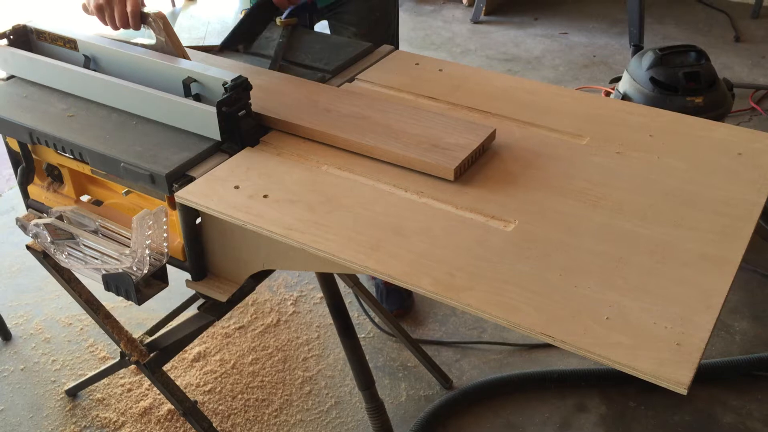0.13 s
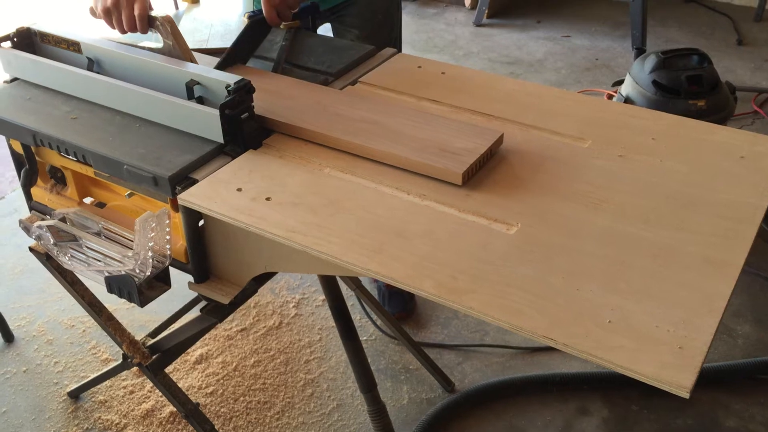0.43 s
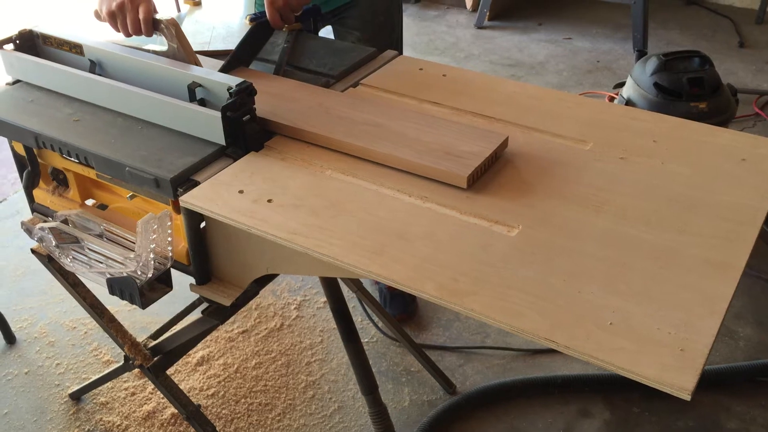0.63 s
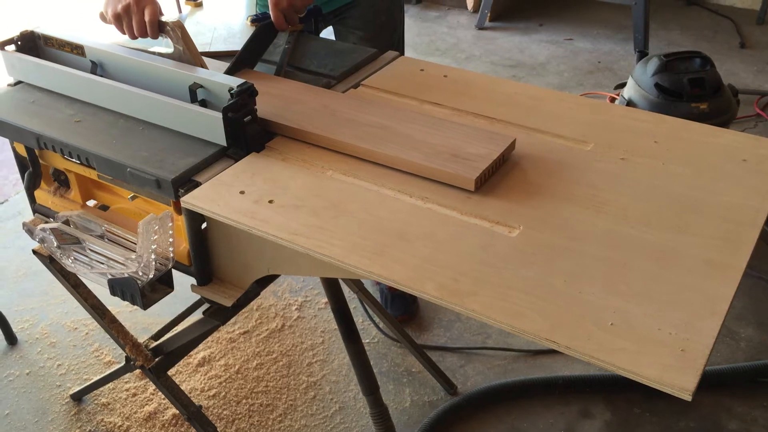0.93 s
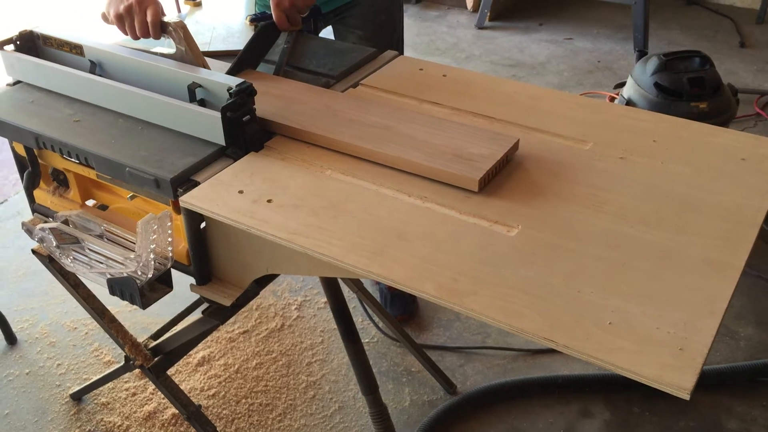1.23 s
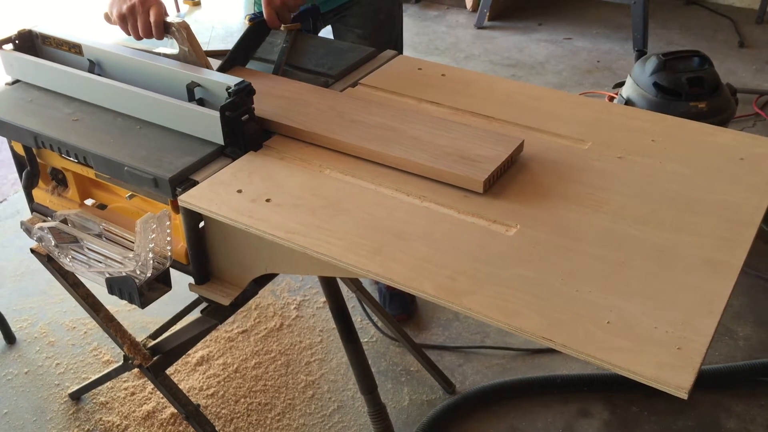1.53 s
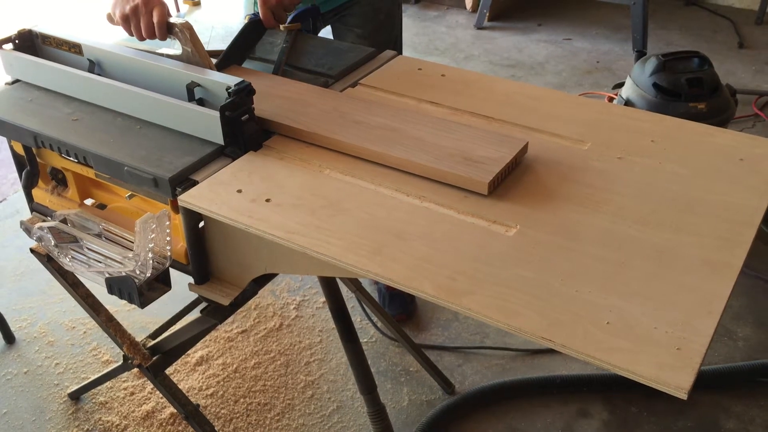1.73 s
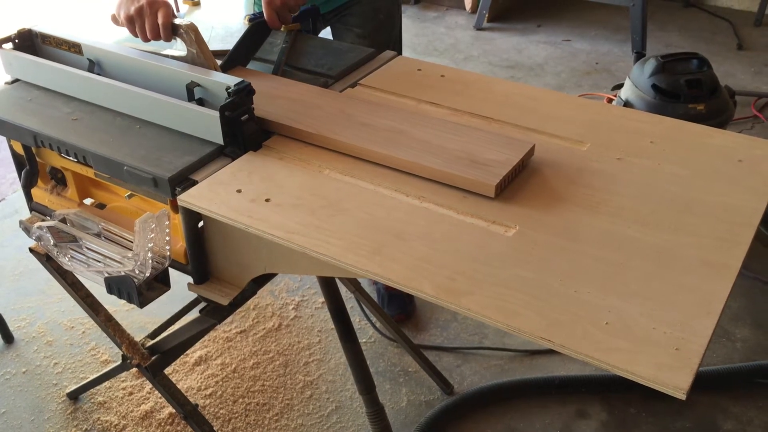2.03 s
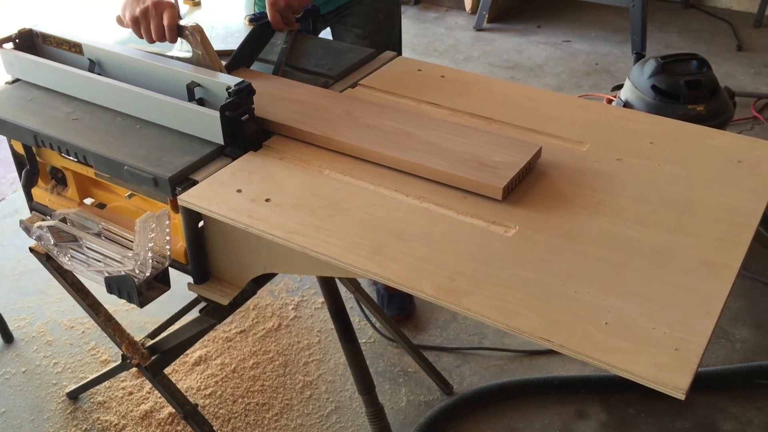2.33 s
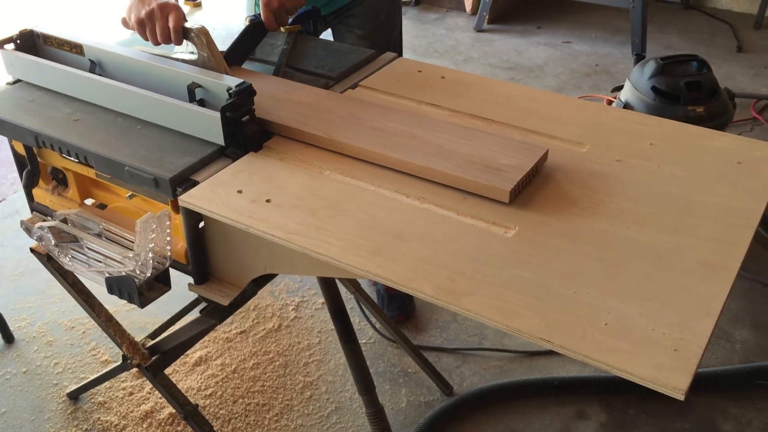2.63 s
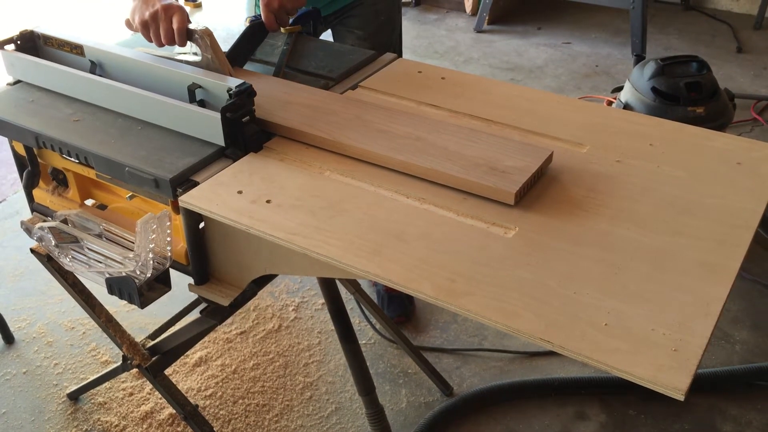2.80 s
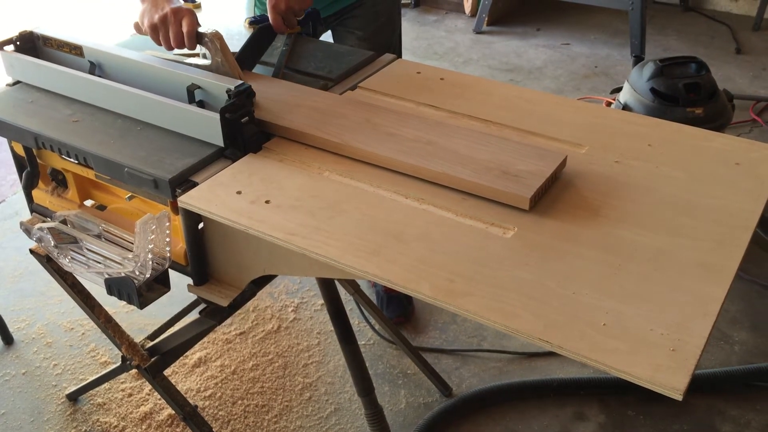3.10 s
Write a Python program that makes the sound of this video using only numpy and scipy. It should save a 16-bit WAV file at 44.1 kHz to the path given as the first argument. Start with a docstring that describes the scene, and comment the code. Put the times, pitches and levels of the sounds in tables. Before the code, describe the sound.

A table saw at full speed cuts in abruptly at about 0.08 seconds after silence. Its rough geared whine climbs slightly in pitch until 1.4, sags a little until about 2.5, then rises again from 3.0 to the end at 3.25, with a brief stronger whine near 3.05. A dense, steady cutting and air roar, boomy in the workshop, fills everything; a shop vacuum hums faintly behind. Mono, no wind-down.

```python
"""In a workshop, a portable table saw rips a board, heard in mono after a brief silence.
A geared brush motor whines as sines on multiples of its shaft speed, which follows a drawn curve.
The slower blade adds side tones and a tooth tone; air, chips and cutting roar underneath as shaped noise
that booms in the stand and room. A shop vacuum hums behind in drifting, wavering tones."""
import sys
import numpy as np
from scipy import signal
from scipy.fft import rfft, irfft, next_fast_len
from scipy.io import wavfile
from scipy.ndimage import uniform_filter1d

SR = 44100
rng = np.random.default_rng(int(sys.argv[2]) if len(sys.argv) > 2 else 0)


def unload_wav(signal):
    """Save mono or channel-first audio to the path in sys.argv[1] as 16-bit WAV at rate SR, clipped to [-1, 1]."""
    wavfile.write(
        sys.argv[1],
        SR,
        np.round(np.clip(np.atleast_2d(signal).T, -1, 1) * 32767).astype(np.int16),
    )


N = 143766  # samples

PINION, WHEEL, BLADE_TEETH = 6, 36, 24  # tooth counts of the reduction gear and the blade
RATTLE = 9 / 11  # rattle turns per shaft turn, perhaps a bearing
WAVER_DB, WAVER_HZ = 5, 4.03  # slow coming and going of the weak tones
FLUTTER_DB, FLUTTER_HZ = 2, 24.9  # quick flutter of the weak tones
STRONG_FLUTTER_DB = 0.7  # the strong tones flutter less, at the same rate


def undb(db):
    """Decibels to linear gain."""
    return 10 ** (np.asarray(db) / 20)


def unit(x):
    """Scale a signal to an rms of 1."""
    return x / np.sqrt(np.mean(x ** 2))


def walk(rate_hz):
    """Random levels held 1 / rate s and slewed twice; spread near 1."""
    hold = int(SR / rate_hz)
    steps = np.repeat(rng.standard_normal(400), hold)[:N]
    return 1.395 * uniform_filter1d(uniform_filter1d(steps, hold), hold)


def curves(table):
    """Columns of a time table, one value per sample."""
    rows = np.array(table)
    time = np.arange(N) / SR
    return [np.interp(time, rows[:, 0], column) for column in rows.T[1:]]


def tone(turns, db):
    """A sine on a running count of turns, at an rms level and a random starting phase."""
    return np.sqrt(2) * undb(db) * np.sin(2 * np.pi * (turns + rng.random()))


def strong_tones(phases, levels):
    """Sines that follow their drawn level curves, each with its own light flutter."""
    return sum(tone(phase, db + STRONG_FLUTTER_DB * walk(FLUTTER_HZ))
               for phase, db in zip(phases, levels))


# Motor under load: (time [s], shaft speed [Hz], then level [dB rms] before flutter of blade teeth,
# shaft multiple 5, gear mesh, shaft multiple 9, rattle multiple 12, shaft multiple 10)
MOTOR_CURVES = [(0.1, 354.5, -46, -44, -24, -31, -32, -37), (0.2, 355.3, -50, -46, -24.5, -38, -34, -33),
                (0.35, 358.6, -34, -46, -27, -39, -30, -26.5), (0.5, 364.7, -31, -48, -32, -33, -29, -39),
                (0.65, 367.8, -28, -42, -36, -30, -41, -43), (0.74, 369.6, -27, -40, -40, -24.5, -36, -42),
                (0.81, 371.7, -25, -38, -43, -29, -29, -40), (0.93, 372.5, -24, -36, -29, -42, -27, -43),
                (1.1, 373.2, -27, -39, -28, -42, -30, -36), (1.25, 375.8, -37, -44, -29, -34, -33, -38),
                (1.4, 379, -36, -39, -29, -39, -29, -32), (1.55, 378.3, -33, -38, -26, -30, -27, -32),
                (1.7, 378.2, -37, -34, -26, -29, -25, -35), (1.85, 377.1, -32, -33, -26, -32, -28, -31),
                (2.0, 374.6, -34, -34, -26, -37, -36, -38), (2.15, 374.2, -36, -35, -26, -35, -35, -37),
                (2.3, 373.6, -29, -34, -25, -31, -29, -35), (2.45, 373.3, -31, -31, -22, -34, -31, -28),
                (2.6, 373.2, -26, -30, -23, -32, -32, -27), (2.75, 373.7, -28, -29, -22, -41, -36, -29),
                (2.9, 373.7, -25, -35, -25, -27, -32, -27), (2.99, 374.3, -33, -32, -20, -27, -34, -29),
                (3.055, 375.2, -32, -33, -16, -26, -36, -28), (3.105, 376.5, -45, -43, -30, -29, -41, -30),
                (3.19, 380.2, -27, -34, -25, -32, -37, -32), (3.25, 383.2, -27, -32, -21, -31, -38, -32)]


def main_tones(turns):
    """Shaft multiples, gear mesh, blade teeth and rattle, all locked to the shaft."""
    teeth = BLADE_TEETH * turns * PINION / WHEEL
    mesh = PINION * turns
    phases = [teeth, 5 * turns, mesh, 9 * turns, 12 * RATTLE * turns, 10 * turns]
    return strong_tones(phases, curves(MOTOR_CURVES)[1:])


# Companions of the main tones: (time [s], then level [dB rms] before flutter of teeth + blade turn,
# mesh - blade turn, mesh + blade turn, shaft multiple 8, multiple 9 + blade turn, rattle,
# rattle multiple 32, shaft, multiple 9 - 2 blade turns, multiple 14)
COMPANION_LEVELS = [(0.1, -33, -47, -28, -47, -47, -40, -56, -35, -49, -52),
                    (0.2, -34, -41, -26.5, -38, -44, -33, -49, -30, -47, -48),
                    (0.35, -38, -41, -32, -39, -47, -37, -60, -40, -37, -50),
                    (0.52, -47, -44, -41, -45, -47, -43, -55, -29, -29, -54),
                    (0.8, -49, -47, -41, -38, -44, -37, -52, -42, -42, -52),
                    (1.05, -42, -32, -34, -35, -46, -35, -55, -48, -40, -54),
                    (1.3, -40, -41, -38, -38, -38, -39, -53, -38, -42, -54),
                    (1.55, -43, -38, -40, -35, -31, -40, -46, -44, -40, -47),
                    (1.8, -48, -37, -38, -34, -38, -39, -53, -39, -41, -48),
                    (2.05, -34, -34, -44, -33, -41, -33, -47, -32, -34, -49),
                    (2.3, -31.5, -43, -42, -33, -47, -36.5, -55, -36, -39, -45),
                    (2.55, -40, -45, -38, -34, -40, -33, -60, -43, -40, -45),
                    (2.8, -31.5, -42, -42, -32, -47, -42, -60, -38, -41, -54),
                    (3.04, -32.5, -38, -47, -35, -47, -34.5, -60, -40, -45, -42),
                    (3.17, -34, -38, -40, -34, -45, -36, -60, -36, -40, -39),
                    (3.25, -39, -38, -25, -32, -44, -35, -60, -33, -42, -36)]


def companion_tones(turns):
    """Tones offset from teeth, mesh and shaft by blade turns, with further shaft and rattle multiples."""
    blade, rattle = turns * PINION / WHEEL, turns * RATTLE
    teeth, mesh = BLADE_TEETH * blade, PINION * turns
    phases = [teeth + blade, mesh - blade, mesh + blade, 8 * turns, 9 * turns + blade,
              rattle, 32 * rattle, turns, 9 * turns - 2 * blade, 14 * turns]
    return strong_tones(phases, curves(COMPANION_LEVELS))


# Weaker shaft multiples, before the sway: (shaft multiple, level [dB rms])
WEAK_MULTIPLES = [(2, -49.5), (3, -43), (11, -66), (12, -49)]
# Side tones from the blade wobbling once a turn, before the sway:
# (shaft multiple, blade turns added [rounded when played], level [dB rms])
WOBBLE_TONES = [(2, -1, -48), (3, 0.56, -45), (5, 1, -46.5), (6, 2, -55), (8, -1, -63), (9, -1, -39)]


def weak_tones(turns, sways):
    """Faint shaft multiples and blade-wobble side tones that come and go."""
    blade = turns * PINION / WHEEL
    voices = [(multiple * turns, db) for multiple, db in WEAK_MULTIPLES]
    voices += [(multiple * turns + round(added) * blade, db) for multiple, added, db in WOBBLE_TONES]
    return sum(tone(phase, db + sway) for (phase, db), sway in zip(voices, sways))


# Whine of fan and commutator: (shaft multiple, level [dB rms] when fully grown, before the sway)
UPPER_TONES = [(13, -52), (15, -49), (16, -50), (18, -49), (19, -45), (20, -47), (24, -45), (25, -49),
               (26, -50), (29, -51), (30, -49), (33, -54), (34, -48.5), (35, -52), (37, -57), (38, -50),
               (39, -55), (40, -56)]
# The upper whine grows as the cut goes on: (time [s], level [dB])
UPPER_RISE = [(.1, -9), (1.3, -7), (1.7, -4), (2.05, 0)]
UPPER_JITTER_TURNS, UPPER_JITTER_HZ = 0.004, 29.87  # shaft unevenness that blurs the tones
UPPER_SWAY_SHARE = 0.55


def upper_whine(turns, sways):
    """High shaft multiples of fan and commutator, blurred by uneven turning."""
    uneven = turns + UPPER_JITTER_TURNS * walk(UPPER_JITTER_HZ)
    upper = sum(tone(multiple * uneven, db + UPPER_SWAY_SHARE * sway)
                for (multiple, db), sway in zip(UPPER_TONES, sways))
    return upper * undb(curves(UPPER_RISE)[0])


def whine(turns):
    """All tones of motor, gear and blade; the weak and upper ones draw on the same level sways."""
    flutter = [FLUTTER_DB * walk(FLUTTER_HZ) for _ in range(6)]
    waver = [WAVER_DB * walk(WAVER_HZ) for _ in range(7)]
    # 7 wavers against 6 flutters: no two tones of a group pair the same two
    sways = [waver[i % 7] + flutter[i % 6] for i in range(len(UPPER_TONES))]
    strong = main_tones(turns) + companion_tones(turns)
    return strong + weak_tones(turns, sways) + upper_whine(turns, sways)


# Colour of the roar, relative within each band: (frequency [Hz], density [dB per Hz])
ROAR_COLOUR = [(15, -69), (25, -39), (50, -34.5), (100, -25), (147, -25.5), (214, -14), (280, -10),
               (400, -8.5), (519, -12), (679, -10), (1100, -8), (1400, -7.5), (1690, -11.5), (2040, -8),
               (2400, -6), (2800, -8), (3300, -6.5), (3700, -6.5), (4200, -11), (4950, -17.5),
               (6500, -19.5), (7820, -23.5), (9690, -21), (11000, -24.5), (13000, -27), (15300, -31.5)]
# Booms and dips of stand and room: (frequency [Hz], width [Hz], gain [dB])
STAND_AND_ROOM = [(72.5, 14, 9), (89.4, 16, 8), (121, 5.4, 12.5), (178.5, 11.3, 12), (248.4, 13, 4.5),
                  (304, 9.9, 7.5), (373, 35, 2.5), (440, 36, 5.5), (670, 75, 4), (768, 17, 4),
                  (896, 32, 5.5), (1302, 35, 5), (225, 10, -10), (540, 17, -1.5), (2400, 140, -4),
                  (2795, 75, -0.5), (3400, 170, 0.5), (6330, 200, 2), (9460, 120, 4), (9700, 170, 2)]
# Roar before swell, flicker and pulse: (time [s], bass level [dB], middle level [dB] before its trim,
# treble level [dB])
ROAR_LEVELS = [(.1, -26.5, -19.5, -29), (.3, -28, -18, -28.5), (.8, -27, -18, -28),
               (1.3, -28.5, -18.5, -28.5), (1.8, -26.5, -19, -29), (2.2, -28, -19, -29),
               (2.6, -30, -19, -30), (3.0, -30.5, -20, -30), (3.12, -31, -21, -30.5), (3.2, -29, -18, -30)]
BASS_HZ, TREBLE_HZ = 900, 4500  # band edges
MIDDLE_TRIM_DB = -2.5  # level trim of the middle roar
SHAFT_PULSE, BLADE_PULSE = 0.17, 0.069  # pulse depth per shaft turn and per blade turn
TREBLE_PULSE_SHARE = 0.4
SWELL_DB, SWELL_HZ = 0.5, 5.0  # moves all bands together
FLICKER_DB, FLICKER_HZ = 0.7, 14.0  # moves each band alone


def roar(turns):
    """Air and cutting noise in three bands; middle and treble pulse with each shaft and blade turn."""
    size = next_fast_len(N)
    hz = np.arange(size // 2 + 1) * SR / size + 1  # shifted 1 Hz to keep the log finite
    colour = np.array(ROAR_COLOUR)
    db = np.interp(np.log(hz), np.log(colour[:, 0]), colour[:, 1])
    db += sum(gain / (1 + (2 * (hz - centre) / width) ** 2) for centre, width, gain in STAND_AND_ROOM)
    noise = rfft(rng.standard_normal(size)) * undb(db)

    low = 1 / (1 + (hz / BASS_HZ) ** 4)
    high = 1 / (1 + (TREBLE_HZ / hz) ** 8)
    swell = SWELL_DB * walk(SWELL_HZ)
    bands = []
    for weight, level in zip((low, 1 - low - high, high), curves(ROAR_LEVELS)):
        band = unit(irfft(noise * weight, size)[:N])
        bands.append(band * undb(level + swell + FLICKER_DB * walk(FLICKER_HZ)))
    bass, middle, treble = bands

    pulse = SHAFT_PULSE * np.sin(2 * np.pi * turns)
    pulse += BLADE_PULSE * np.sin(2 * np.pi * turns * PINION / WHEEL)
    middle = (1 + pulse) * undb(MIDDLE_TRIM_DB) * middle
    return bass + middle + (1 + TREBLE_PULSE_SHARE * pulse) * treble


# Tones of the shop vacuum and the mains, before drift and waver: (frequency [Hz], level [dB rms])
VACUUM_TONES = [(119.5, -50.5), (181, -46), (777, -44), (1118, -37), (1301, -44.5), (1350, -42.5),
                (1490, -42.5), (1863, -45), (9455, -47), (10489, -65)]
# Hum of the vacuum's shaft, before flutter: (time [s], level [dB rms])
VACUUM_HUM_LEVEL = [(.42, -32), (.85, -46), (1.25, -38), (2.9, -39)]
VACUUM_HUM_HZ = 372.3  # before drift
VACUUM_DRIFT, VACUUM_DRIFT_HZ = 0.0006, 6.11  # relative pitch drift and its rate
VACUUM_WAVER_DB, VACUUM_WAVER_HZ = 3.5, 18.0


def vacuum():
    """Nearly fixed tones on one slightly drifting clock, each wavering in level."""
    clock = np.cumsum(1 + VACUUM_DRIFT * walk(VACUUM_DRIFT_HZ)) / SR
    hum_db = curves(VACUUM_HUM_LEVEL)[0] + FLUTTER_DB * walk(VACUUM_WAVER_HZ)
    hum = tone(VACUUM_HUM_HZ * clock, hum_db)
    return hum + sum(tone(hz * clock, db + VACUUM_WAVER_DB * walk(VACUUM_WAVER_HZ))
                     for hz, db in VACUUM_TONES)


def scene():
    """Whine and roar on one shaft, the vacuum behind, the same in both channels."""
    shaft_hz = curves(MOTOR_CURVES)[0]
    turns = np.cumsum(shaft_hz) / SR
    mono = whine(turns) + roar(turns) + vacuum()
    return np.tile(mono, (2, 1))


START_S, FADE_S = 0.083, 0.0019  # opening silence and the quick fade after it
TOP_HZ = 15290


def record(dry):
    """The sound cuts in after a short silence; a steep low-pass removes the top."""
    gate = np.clip((np.arange(N) / SR - START_S) / FADE_S, 0, 1)
    low_pass = signal.ellip(16, 0.2, 60, TOP_HZ, fs=SR, output="sos")  # order, ripple dB, stop dB
    return signal.sosfilt(low_pass, dry * gate)


dry = scene()
out = record(dry)
unload_wav(out)
```